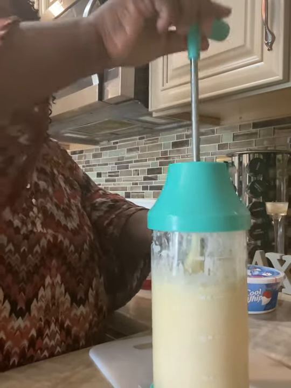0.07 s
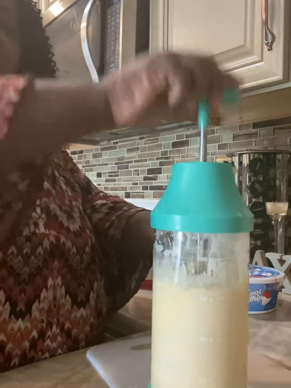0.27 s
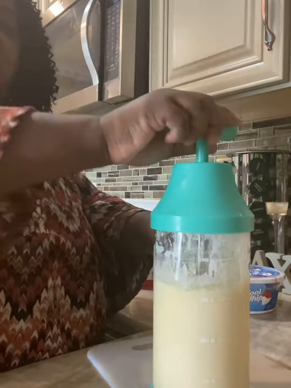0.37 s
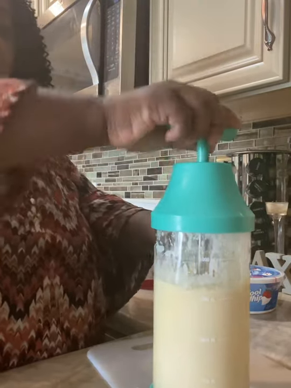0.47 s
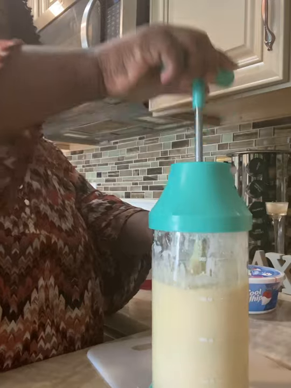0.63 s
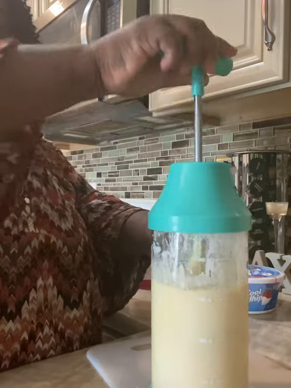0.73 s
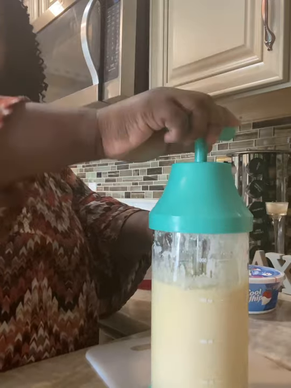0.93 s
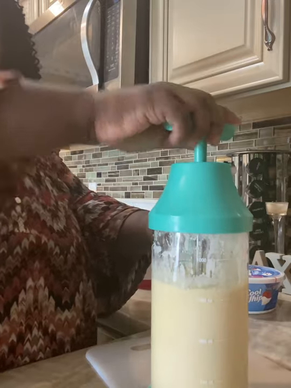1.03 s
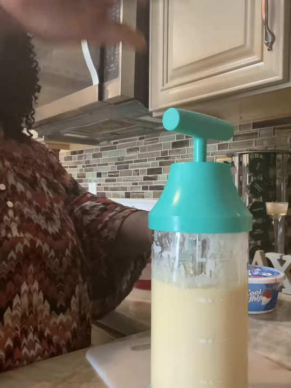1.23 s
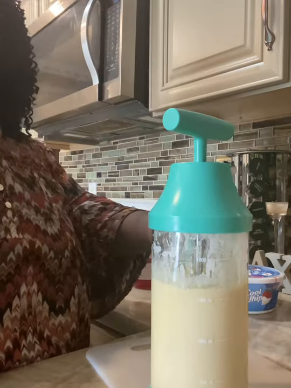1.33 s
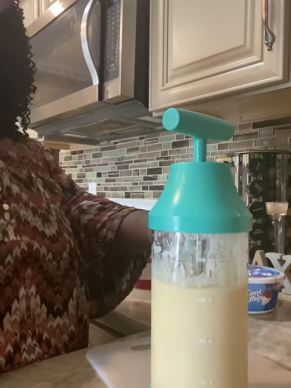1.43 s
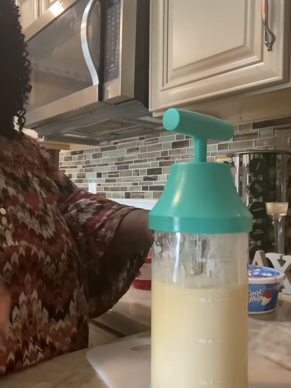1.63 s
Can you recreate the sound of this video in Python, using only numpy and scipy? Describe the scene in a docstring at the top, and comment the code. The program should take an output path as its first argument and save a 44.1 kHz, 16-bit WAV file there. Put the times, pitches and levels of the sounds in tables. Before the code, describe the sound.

A hand plunger mixer is pumped twice in a jug of batter, close by in a kitchen. The wet rod swishes and chatters through the lid, and each downstroke ends in a plastic clack and a dull thud.

```python
"""A wet swish and chatter comes first: the steel rod of a plunger mixer slides through its plastic lid.
The mixer is pumped twice, close by, in a jug of batter on a kitchen counter. Each downstroke ends with
the handle clacking on the lid and the jug thudding on the counter. Faint thin tones and the rustle of
a sleeve follow. The kitchen rings briefly over a low hum."""
import sys
import numpy as np
from scipy import signal
from scipy.fft import rfft, irfft, next_fast_len
from scipy.io import wavfile
from scipy.ndimage import map_coordinates

SR = 44100
rng = np.random.default_rng(int(sys.argv[2]) if len(sys.argv) > 2 else 0)


def generate_wav(sig):
    """Save sig (samples, or channels by samples) to the path in sys.argv[1] as 16-bit PCM at SR."""
    pcm = np.round(np.clip(np.atleast_2d(sig).T, -1, 1) * 32767).astype(np.int16)
    wavfile.write(sys.argv[1], SR, pcm)


N = 74970  # 1.7 seconds

# The rod's strokes, one list each for down, up, down
# (time [s], relative hiss level [dB], relative chatter level [dB])
ROD_STROKES = [
    [(0.0, -48.5, -48), (0.09, -69, -63), (0.116, -41, -55.5), (0.13, -40.5, -29.5), (0.152, -36, -52),
     (0.162, -37, -30.5), (0.196, -35, -53.5), (0.206, -38, -47), (0.228, -34.5, -28.5),
     (0.242, -37.5, -34.5), (0.27, -36, -31.5), (0.281, -28.5, -20.5)],
    [(0.47, -48.5, -49.5), (0.484, -60.5, -53.5), (0.498, -31, -44), (0.508, -35.5, -33.5),
     (0.548, -37, -43.5), (0.562, -42.5, -50.5), (0.598, -46, -59), (0.62, -53, -33.5), (0.654, -62.5, -64),
     (0.68, -80.5, -67.5)],
    [(0.73, -54.5, -53.5), (0.752, -54, -56), (0.76, -35, -39), (0.794, -31.5, -30.5), (0.83, -37, -46.5),
     (0.84, -35, -33.5), (0.855, -28, -23)],
]
# The tone of the bright hiss and of the lower chatter (frequency [Hz], relative level [dB])
HISS_TONE = [(500, -23.5), (1500, -20.5), (3000, -11), (4800, -6.5), (7600, -3), (9500, -7), (11000, -18),
             (12500, -17)]
CHATTER_TONE = [(400, -8.5), (1200, -13), (1700, -8), (2200, -9.5), (2700, 1), (3700, -1), (4600, -7),
                (7000, -27.5)]
def rod():
    """The wet rod slides through the lid, hissing and chattering unevenly."""
    hiss_gain_db, chatter_gain_db, bubbles_db, judder_db = -3, -4.5, -8, 2.5
    out = np.zeros(N)
    for stroke in ROD_STROKES:
        times, hiss_db, chatter_db = np.transpose(stroke)
        loudness = lambda db: amp(np.interp(clock(), times, db, left=-120, right=-120))
        wet_hiss = friction(HISS_TONE) + amp(bubbles_db) * bubbles()
        hiss = amp(hiss_gain_db) * loudness(hiss_db) * wet_hiss
        chatter = amp(chatter_gain_db) * loudness(chatter_db) * friction(CHATTER_TONE)
        out += (hiss + chatter) * amp(judder_db * wobble(per_s=129.7))
    return out


def friction(tone):
    """Rubbing is thousands of tiny slips a second, and each one also rings the rod and lid."""
    slips_per_s, spread_db, ring_db = 3500, 2, -19.5
    slips = (rng.random(N) < slips_per_s / SR) * rng.choice([-1, 1], N)
    slips = slips * amp(spread_db * rng.standard_normal(N))
    ringing = signal.fftconvolve(slips, lid_ring(clock()[:SR // 4]))[:N]
    return coloured(unit(slips) + amp(ring_db) * unit(ringing), tone)


def bubbles():
    """Tiny bubbles of batter burst in the seal, each a brief high ping."""
    pops_per_s, centre_hz, spread_octaves, fade_s = 260, 7025, 0.3, 0.007
    count = int(pops_per_s * N / SR)
    starts = rng.integers(N, size=(count, 1))
    t = np.arange(int(fade_s * SR)) / SR
    hz = centre_hz * 2 ** (spread_octaves * rng.standard_normal((count, 1)))
    pings = rng.random((count, 1)) * fade(t, fade_s) * np.sin(2 * np.pi * hz * t)
    positions = starts + np.arange(len(t))
    return unit(np.bincount(positions.ravel(), pings.ravel(), N)[:N])  # add each ping in its place


# The notes that the rod and lid ring at (frequency [Hz], relative level [dB])
LID_NOTES = [(1324, -8), (1450, -15.5), (1720, 2.5), (2610, -6.5), (3010, -4.5), (3270, -17), (3470, -11.5),
             (3850, 1), (5600, 1.5), (6100, 4), (6500, 1.5), (7150, -8), (7700, -6.5)]
def lid_ring(t, fade_s=0.045):
    """The plastic lid rings with many notes, all dying equally fast."""
    return ring([(hz, db, fade_s) for hz, db in LID_NOTES], t, build_cycles=6, scatter_db=1.5)


# Moments when the rod sticks in its seal (time [s], length [s], centre frequency [Hz], level [dB])
SEAL_SQUEAKS = [(0.121, 0.013, 2696, -35.5), (0.129, 0.032, 8280, -36), (0.156, .014, 2688, -35),
                (0.214, 0.023, 7780, -34), (0.217, 0.027, 2697, -34.5), (0.489, 0.033, 3450, -33),
                (0.604, 0.023, 3150, -48), (0.753, 0.037, 3130, -35.5), (0.809, 0.012, 4370, -36.5),
                (0.835, 0.033, 2990, -24.5)]
def squeaks():
    """Where the rod sticks and slips, it rasps on several neighbouring lid notes at once."""
    half_width_hz, rough_db = 51, 0.5
    out = np.zeros(N)
    lid_peaks = lambda f: sum(amp(db) / (1 + ((f - hz) / half_width_hz) ** 2) for hz, db in LID_NOTES)
    for start, length, centre_hz, db in SEAL_SQUEAKS:
        tone = lambda hz: lid_peaks(hz) * band(hz, centre_hz, octaves=0.19)
        rasp = unit(filtered(rng.standard_normal(N), tone))
        out += amp(db - rough_db * wobble(per_s=300)) * swell(start, length) * rasp
    return out


# The plunger's hits and bounces (time [s], relative level [dB], added brightness [dB per octave])
LID_HITS = [(0.2817, -7.5, -1.9), (0.2859, -13.5, 0.5), (0.2926, -18, 2.5), (0.615, -41.5, 0),
            (0.8556, -9.5, 0.8), (0.8603, -14, -1)]
# The tone of a clack (frequency [Hz], relative level [dB])
CLACK_TONE = [(60, -24.5), (300, -8.5), (500, -9.5), (800, -16), (1050, -9), (1350, 2.5), (1650, 1),
              (2200, -8.5), (3000, 3), (4000, -7), (4700, -11), (6300, -4.5), (8500, -11.5), (11000, -20.5),
              (12500, -29.5)]
def clacks():
    """The plunger hits the lid at either end of its travel: a click, a short rattle and a ring."""
    click_db, ring_db = 7, -17.5
    out, t = np.zeros(N), clock()[:SR // 2]
    for start, db, brightness in LID_HITS:
        tone = [(hz, level + brightness * np.log2(hz)) for hz, level in CLACK_TONE]
        rattle = fade(t, fade_s=0.022) * coloured(rng.standard_normal(N), tone)[:len(t)]
        clack = amp(click_db) * click(tone) + rattle + amp(ring_db) * lid_ring(t)
        out += amp(db) * placed(clack, start)
    return out


# The jug's knocks on the counter (time [s], relative level [dB], build-up [cycles])
COUNTER_HITS = [(0.283, -11.5, 0.83), (0.859, -13.5, 0.75)]
# The full jug's low notes (frequency [Hz], relative level [dB], time to fade by 60 dB [s])
JUG_NOTES = [(52.55, -13.5, 0.22), (78.1, -4.5, .13), (100.8, -1.5, .1), (125.1, -7.5, 0.19),
             (168.7, -12.5, 0.17), (200.8, 1, 0.097), (240.2, -2.5, 0.076), (338.5, -3.5, 0.08),
             (446.7, 4, .06), (501, -4, .056), (566.6, -9.5, 0.035)]
# The tone of the batter's dull slap (frequency [Hz], relative level [dB])
SLAP_TONE = [(60, -13.5), (150, 3), (480, -1), (750, -32.5), (2000, -50)]
def thuds():
    """Just after the handle lands, the jug thuds on the counter and the batter slaps inside it."""
    low_hz, high_hz, slap_db = 52.3, 670, -17
    out, t = np.zeros(N), clock()[:SR // 2]
    counter = signal.butter(2, [low_hz, high_hz], "bandpass", fs=SR, output="sos")
    for start, db, build_cycles in COUNTER_HITS:
        jug = ring(JUG_NOTES, t, build_cycles, scatter_db=2)
        slap = fade(t, fade_s=0.34) * coloured(rng.standard_normal(N), SLAP_TONE)[:len(t)]
        out += amp(db) * placed(signal.sosfilt(counter, jug + amp(slap_db) * slap), start)
    return out


# Faint peeps (time [s], length [s], frequency [Hz], level [dB])
THIN_TONES = [(1.17, 0.17, 1224, -56), (1.441, 0.051, 2775, -62), (1.645, 0.082, 1133, -65)]
def peeps():
    """Thin, wavering tones are heard once the pumping stops."""
    out = np.zeros(N)
    for start, length, hz, db in THIN_TONES:
        wavering_hz = hz * (1 + 0.045 * wobble(per_s=260))
        phase = 2 * np.pi * np.cumsum(wavering_hz) / SR
        out += amp(db + wobble(per_s=260)) * swell(start, length) * np.sin(phase)
    return out


# The sleeve's movements (time [s], length [s], centre frequency [Hz], width [octaves], level [dB])
SLEEVE_RUSTLES = [(1.474, 0.19, 3460, 0.89, -65), (1.559, 0.05, 5780, 0.39, -61)]
def sleeve():
    """Cloth rustles softly as the arm draws away."""
    out = np.zeros(N)
    for start, length, centre_hz, octaves, db in SLEEVE_RUSTLES:
        rustle = filtered(rng.standard_normal(N), lambda hz: band(hz, centre_hz, octaves))
        out += amp(db) * swell(start, length) * unit(rustle)
    return out


# How long the kitchen rings (frequency [Hz], time to fade by 60 dB [s])
KITCHEN_FADE = [(100, 0.49), (400, 0.43), (1100, 0.86), (3500, 0.66), (7000, 0.57), (11000, 0.46)]
def kitchen(sound):
    """Quick, thin echoes come off the cupboards, then the whole room rings on."""
    tail_db, early_db, bass_cut_hz, wall_delay_s = -12.5, -7, 638, 0.004
    hz, t, bands = signal.stft(room_noise(), SR, nperseg=256)
    bands = bands * fade(t, along(KITCHEN_FADE, hz)[:, None])
    tail = signal.istft(bands, SR, nperseg=256)[1][:, :N]
    tail = amp(tail_db) * tail / np.linalg.norm(tail[0])
    early = room_noise() * fade(clock(), fade_s=0.093)
    early = amp(early_db) * early / np.linalg.norm(early[0])
    early = signal.sosfilt(signal.butter(2, bass_cut_hz, "highpass", fs=SR, output="sos"), early)
    echoes = signal.fftconvolve(sound[None], early + tail, axes=1)[:, :N]
    return filtered(echoes, lambda f: np.exp(-2j * np.pi * f * wall_delay_s))


def lingering_echo():
    """A soft, fading wash of noise: the room still rings from an earlier pump."""
    wash = coloured(room_noise(), tone=[(100, -7.0), (1000, 2.5), (8000, -22.0)])
    return amp(-55) * fade(clock(), fade_s=0.93) * wash


# The tone of the background rumble (frequency [Hz], relative level [dB])
RUMBLE_TONE = [(25, -24), (55, -9), (240, -9), (370, -8.5), (520, -16), (700, -30.5), (3200, -31.5),
               (12000, -47.5)]
def appliances():
    """Kitchen appliances rumble quietly, with a low hum from the mains."""
    rumble_db, hum_db, hum_hz = -54.5, -59.5, 61
    rumble = amp(rumble_db) * coloured(room_noise(), RUMBLE_TONE)
    hum = amp(hum_db + 2.4 * wobble(per_s=25)) * np.sin(2 * np.pi * hum_hz * clock())
    return rumble + hum


# How alike the room sounds on the left and right (frequency [Hz], likeness [0 to 1])
SIDES_ALIKE = [(60, .995), (250, .95), (580, .65), (1250, .2), (5700, .3), (11000, 0)]
def room_noise():
    """Noise from all around: left and right are alike in the bass and unrelated in the treble."""
    angle = lambda hz: np.arccos(np.clip(along(SIDES_ALIKE, hz), -1, 1)) / 2
    shares = lambda hz: np.array([np.cos(angle(hz)), np.sin(angle(hz))])
    mid, side = filtered(rng.standard_normal((2, N)), shares)
    return np.array([mid + side, mid - side])


# How far the left wave runs ahead of the right (frequency [Hz], lead [radians])
LEFT_LEAD = [(200, 0), (550, -.35), (850, -2), (1650, 0), (2300, -.2), (2840, -2.6), (3100, -1.2),
             (3650, .5), (8500, -.6), (12000, -2.5)]
# How much louder the left is than the right (frequency [Hz], level gap [dB])
LEFT_LOUDER = [(100, -.2), (250, -.8), (500, -2), (1000, 2), (2200, -1), (4000, .6), (9000, -.3)]
def direct_path(sound):
    """Sound that comes straight over reaches each side with a slightly different level and timing."""
    sides = np.array([[.5], [-.5]])
    balance = lambda hz: amp(sides * along(LEFT_LOUDER, hz))
    timing = lambda hz: np.exp(1j * sides * along(LEFT_LEAD, hz))
    return filtered(sound, lambda hz: balance(hz) * timing(hz))


def ring(notes, t, build_cycles, scatter_db):
    """A struck object's notes build up and fade, each hit a little harder or softer by chance."""
    out = np.zeros(len(t))
    for hz, db, fade_s in notes:
        strength = amp(db + scatter_db * rng.standard_normal())
        build_up = 1 - np.exp(-hz * t / build_cycles)
        out += strength * build_up * fade(t, fade_s) * np.sin(2 * np.pi * hz * t)
    return out


def click(tone):
    """The sharpest click that has this tone, with a peak of 1."""
    cepstrum = irfft(np.log(amp(along(tone, np.fft.rfftfreq(SR, 1 / SR)))))
    one_sided = cepstrum * (1 + np.sign(np.fft.fftfreq(SR)))  # packs the energy at the start
    pulse = irfft(np.exp(rfft(one_sided)))[:SR // 2]
    return pulse / np.abs(pulse).max()


def amp(db):
    """Turn decibels into a number to multiply by."""
    return 10 ** (np.asarray(db) / 20)


def unit(x):
    """Scale a sound to an average strength (rms) of 1."""
    return x / np.sqrt(np.mean(x ** 2) + 1e-20)


def clock():
    """The time of each sample, in seconds."""
    return np.arange(N) / SR


def fade(t, fade_s):
    """Die away by 60 dB every fade_s seconds."""
    return amp(-60 * t / fade_s)


def swell(start, length):
    """A smooth rise and fall."""
    return np.sin(np.pi * np.clip((clock() - start) / length, 0, 1))


def wobble(per_s):
    """A smooth curve through per_s random values a second."""
    return map_coordinates(rng.standard_normal(int(N * per_s / SR) + 4), [clock() * per_s])


def placed(x, start):
    """Put a sound into the scene at start seconds."""
    return np.pad(x, (round(start * SR), N))[:N]


def along(points, hz):
    """Read between the rows of a (frequency, value) table, with octaves evenly spaced."""
    frequencies, values = np.transpose(points)
    return np.interp(np.log(hz + 1), np.log(frequencies + 1), values)


def band(hz, centre_hz, octaves):
    """A bell-shaped curve that keeps the frequencies near centre_hz."""
    return np.exp(-.5 * (np.log2((hz + 1) / centre_hz) / octaves) ** 2)


def filtered(x, response):
    """Multiply each frequency in a sound by response(hz)."""
    size = next_fast_len(N + SR // 2)
    return irfft(rfft(x, size) * response(np.fft.rfftfreq(size, 1 / SR)), size)[..., :N]


def coloured(x, tone):
    """Shape a sound with a tone table, at an average strength of 1."""
    return unit(filtered(x, lambda hz: amp(along(tone, hz))))


def scene():
    """The mixer is heard directly and through two sets of room echoes, over the background."""
    soft_sounds = rod() + squeaks() + peeps() + sleeve()
    mixer = lambda: soft_sounds + clacks() + thuds()  # the hits sound a bit different in each direction
    direct = direct_path(mixer())
    echoes = (kitchen(mixer()) + kitchen(mixer())) / np.sqrt(2)
    return direct + echoes + lingering_echo() + appliances()


def record(dry):
    """A steep cut removes the very highest treble."""
    top_hz = 12700
    return filtered(dry, lambda hz: 1 / (1 + (hz / top_hz) ** 80))


dry = scene()
out = record(dry)
generate_wav(out)
```